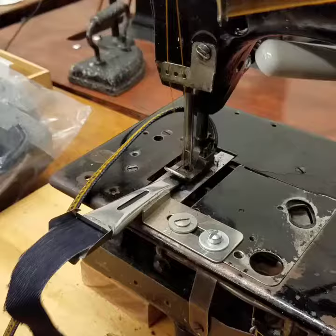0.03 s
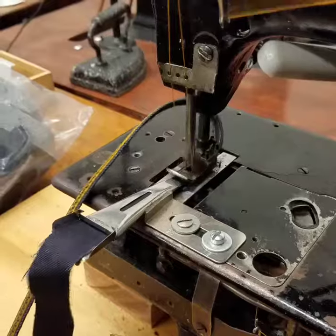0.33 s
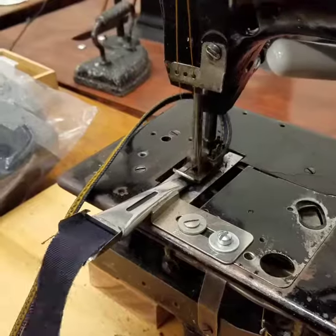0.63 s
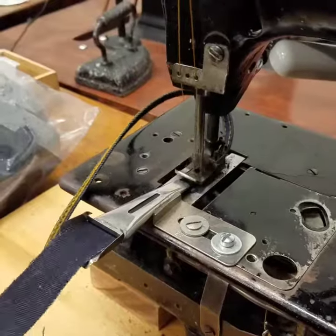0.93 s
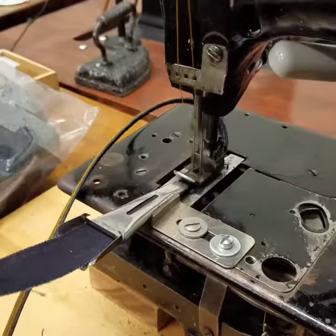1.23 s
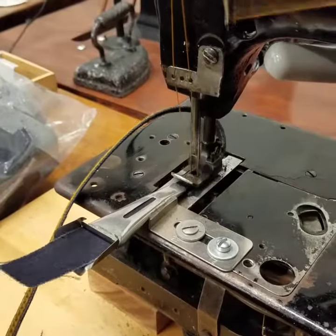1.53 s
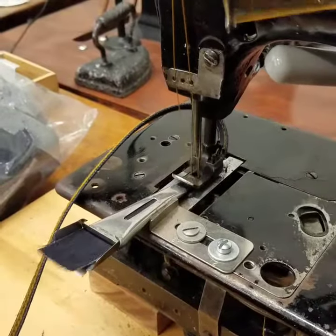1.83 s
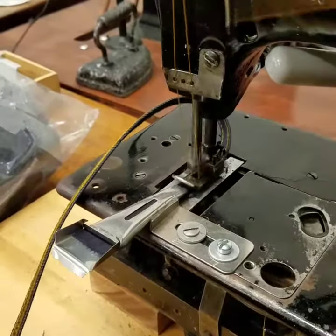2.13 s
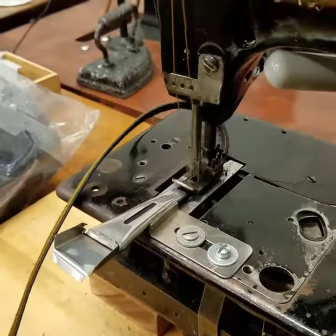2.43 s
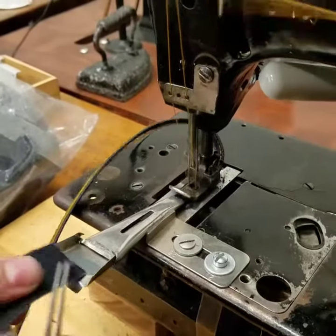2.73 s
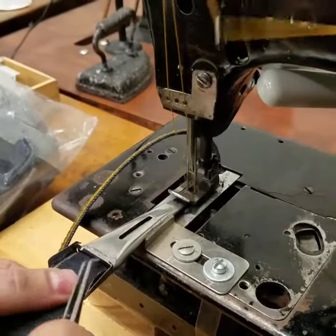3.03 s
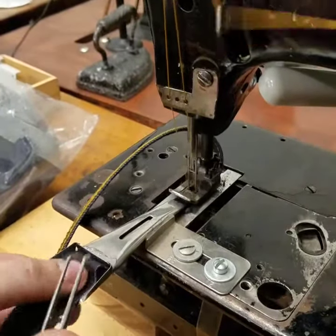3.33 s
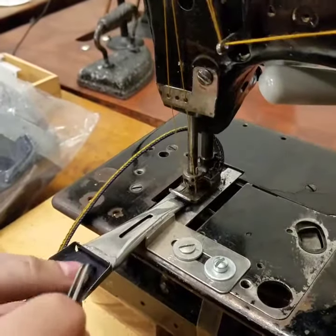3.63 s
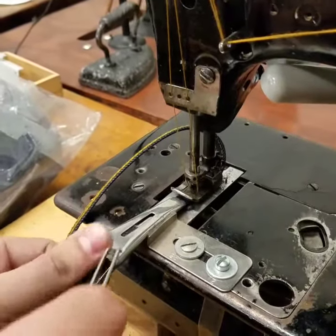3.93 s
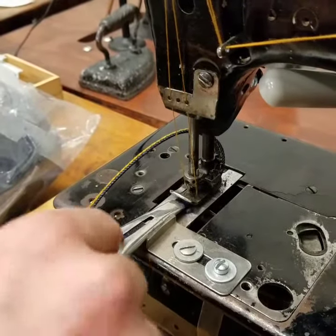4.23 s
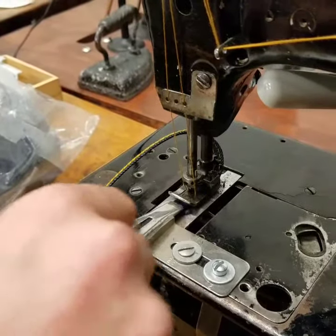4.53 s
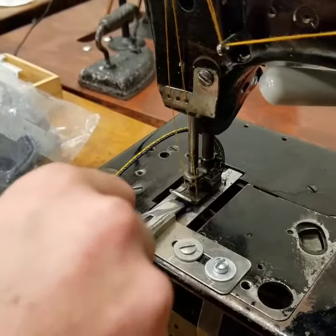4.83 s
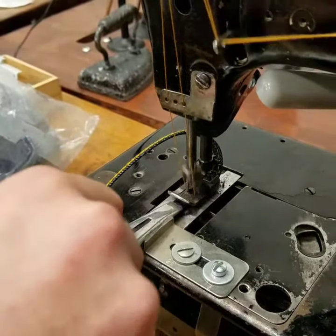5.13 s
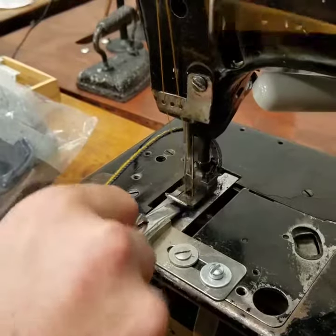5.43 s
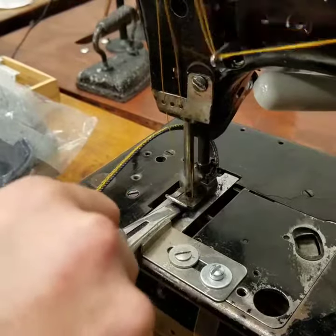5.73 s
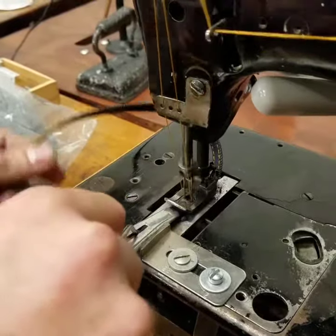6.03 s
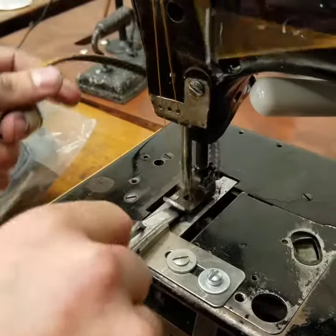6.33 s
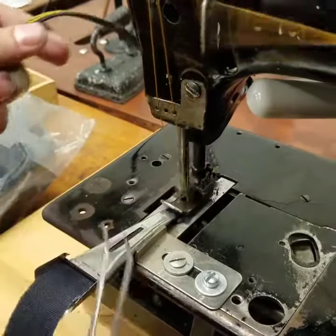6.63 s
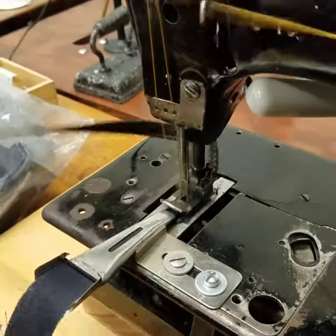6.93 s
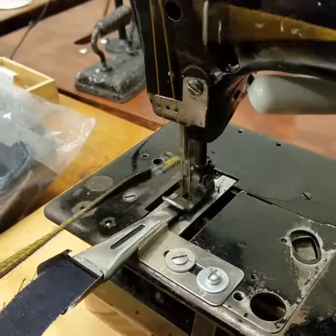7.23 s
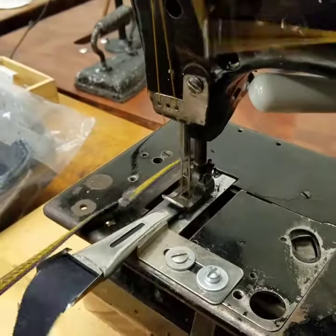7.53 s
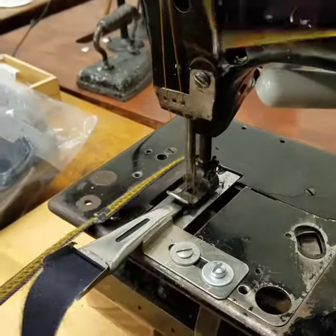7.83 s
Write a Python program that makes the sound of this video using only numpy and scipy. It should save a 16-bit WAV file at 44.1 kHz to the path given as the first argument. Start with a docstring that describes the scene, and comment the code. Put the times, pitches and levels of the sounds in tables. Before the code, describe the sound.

Loud, rapid sewing machine clatter winds down, pauses with light tweezer clicks over a faint motor hum, then bursts briefly and runs again.

```python
"""An old industrial sewing machine clatters flat out, binding a tape; it slows to a stop, makes a short
burst and runs again. Every stitch is a down blow and a lighter return blow that clack the linkage, ring
the cast arm and shake the table, while the shafts whirr and the thread sizzles. In the pause the motor
idles, tweezers click on the steel tape guide, the machine knocks softly and hands brush the bed."""
import sys
import numpy as np
from scipy import signal
from scipy.fft import rfft, irfft, next_fast_len
from scipy.io import wavfile
from scipy.ndimage import uniform_filter1d

SR = 44100
rng = np.random.default_rng(int(sys.argv[2]) if len(sys.argv) > 2 else 0)


def write(x):
    x = np.atleast_2d(x).T
    wavfile.write(sys.argv[1], SR, np.round(np.clip(x, -1, 1) * 32767).astype(np.int16))


N = 356769
TIME = np.arange(N) / SR


def amp(db):
    """Decibels to gain."""
    return 10 ** (np.asarray(db) / 20)


def unit(x):
    """Scale to rms 1."""
    return x / np.sqrt(np.mean(x ** 2) + 1e-20)


def along(points, hz):
    """Read (Hz, value) points on a log frequency axis."""
    f, v = np.transpose(points)
    return np.interp(np.log(hz + 1), np.log(f + 1), v)


def filtered(x, response):
    """EQ x with a gain that is a function of frequency."""
    size = x.shape[-1]
    padded = next_fast_len(size + 8192)
    return irfft(rfft(x, padded) * response(np.fft.rfftfreq(padded, 1 / SR)), padded)[..., :size]


def noise(colour, alike, size=N):
    """Coloured stereo noise of rms 1; both ears share `alike` of the treble and nearly all the bass."""
    mid, side = filtered(rng.standard_normal((2, size)), lambda hz: amp(along(colour, hz)))
    width = np.sqrt((1 - alike) / (1 + alike))
    side = filtered(side, lambda hz: width * np.clip(hz / 1100, .1, 1))
    return unit(np.array([mid + side, mid - side]))


def grains(depth_db, size):
    """A spiky gain of rms 1, each spike about size samples long."""
    return unit(amp(depth_db * unit(uniform_filter1d(rng.standard_normal(N), size))))


def impulses(times, db):
    """One impulse for each blow."""
    return np.bincount(np.round(np.clip(times, 0, None) * SR).astype(int), amp(db), N)[:N]


def delayed(blows, seconds):
    """The same blows a moment later."""
    return np.pad(blows, (round(seconds * SR), 0))[:N]


def ring(blows, modes, lag_s=.00013):
    """Blows ring damped modes of alternating sign; the left ear hears them lag_s later."""
    t = np.clip(np.arange(SR // 2) / SR - np.array([[lag_s], [0]]), 0, None)
    answer = sum((-1) ** k * amp(db - 60 * t / t60) * np.sin(2 * np.pi * hz * t)
                 for k, (hz, db, t60) in enumerate(modes))
    return signal.fftconvolve(blows[None], answer, axes=1)[:, :N]


def burst(blows, colour, t60, repeat, alike):
    """Dense ringing after each blow: the share `repeat` is the same every time, the rest is new."""
    size = SR // 4
    fade = amp(-60 * np.arange(size) / SR / t60)
    same = signal.fftconvolve(blows[None], fade * noise(colour, alike, size), axes=1)[:, :N]
    envelope = np.sqrt(np.abs(signal.fftconvolve(blows ** 2, fade ** 2)[:N]))
    fresh = envelope * noise(colour, alike)
    return np.sqrt(repeat) * same + np.sqrt(1 - repeat) * fresh


# Low room tone. Each row: frequency in Hz, relative level in dB.
ROOM_TONE = [(15, -32), (25, -13.5), (120, 7), (249, -9.5), (301, 9), (439, -41), (1160, -15.5),
             (1440, -24), (2480, -36), (3160, -32), (4370, -36.5), (16000, -64)]
# The motor's two hum notes. Each row: pitch in Hz, relative level in dB.
MOTOR_HUM = [(70.0, -60), (118.4, -57.5)]
def idling_motor():
    """The clutch motor hums all the time over the air of the room."""
    hum = sum(np.sqrt(2) * amp(db - 3.5) * np.sin(2 * np.pi * (hz * TIME + rng.random()))
              for hz, db in MOTOR_HUM)
    return hum + amp(-55) * noise(ROOM_TONE, alike=.25)


# A tail that lingers in the lows. Each row: frequency in Hz, time to fall 60 dB (t60) in seconds.
ROOM_DECAY = [(150, 0.98), (400, 1), (2500, 0.23), (6000, 0.11), (15000, 0.065)]
# EQ of the reverb return. Each row: frequency in Hz, gain in dB.
REVERB_EQ = [(60, -34), (300, -16.5), (600, -18), (1200, -13), (2500, -12), (6000, -9), (15000, -10.5)]
def workshop(x):
    """The room's reverb, each frequency dying at its own speed."""
    hz, t, spectrum = signal.stft(rng.standard_normal((2, SR // 2)), SR, nperseg=256)
    decay = amp(-60 * t / along(ROOM_DECAY, hz)[:, None])
    mid, side = signal.istft(spectrum * decay, SR, nperseg=256)[1]
    side = filtered(side, lambda f: np.clip(f / 1200, 0, 1))  # long waves reach both ears alike
    tail = np.array([mid + side, mid - side])
    tail = filtered(tail / np.linalg.norm(tail[0]), lambda f: amp(along(REVERB_EQ, f)))
    return signal.fftconvolve(x, tail, axes=1)[:, :N]


# Bright contact on the guide, for scrapes and ticks. Each row: frequency in Hz, relative level in dB.
GUIDE_COLOUR = [(290, -45), (500, -1.5), (1400, -11), (2540, 4.5), (3290, -9.5), (4940, 5), (5630, -5.5),
                (7980, -6.5), (9770, -7.5), (11500, -0.5), (16000, -9)]
# Pushes of the tape. Each row: middle in seconds, half length in seconds, relative level in dB.
TAPE_PUSHES = [(3.813, 0.01, -55), (3.88, 0.02, -64), (4.05, 0.0049, -61.5), (4.582, 0.011, -55.5),
               (4.624, 0.014, -51), (4.755, 0.044, -61.5), (5.205, 0.022, -51.5)]
def tape():
    """The weave catches on the steel guide in short grainy strokes."""
    push = sum(amp(db) * np.exp(-.5 * ((TIME - middle) / half) ** 2) for middle, half, db in TAPE_PUSHES)
    return push * grains(depth_db=2, size=90) * noise(GUIDE_COLOUR, alike=.18)


# Small clicks and knocks. Each row: start in seconds, relative level in dB, bed and arm sends in dB.
SMALL_HITS = [(3.276, -12, -13.5, -27), (3.7288, -31.5, -8.5, -17), (3.8708, -37.5, -15, -30),
              (3.881, -38.5, -23, -28), (3.896, -44, -16, -28), (4.1222, -23, -25, -17),
              (4.2092, -22.5, -28.5, -27), (4.2221, -14.5, -19, -38), (4.2974, -31.5, -24, -27),
              (4.4037, -47, -23, -6), (4.477, -44.5, -7, -1), (4.7023, -36.5, -16, -33),
              (4.854, -28, -24, -13.5), (4.9735, -27, -20, -23), (5.09, -45, -15.5, -18),
              (5.1102, -50, 4.5, 10)]
# Thin ping of the guide. Each row: pitch in Hz, relative level in dB, t60 in seconds.
GUIDE_MODES = [(2480, -5, .05), (2650, -10, .1), (4860, -9, .1), (5250, -12, .09), (11650, -2, .05),
               (15050, -7, .05)]
# Dull knock of the bed. Each row: frequency in Hz, relative level in dB.
BED_COLOUR = [(80, -25), (170, 6.5), (300, -4.5), (430, -16), (600, -3.5), (780, -3.5), (1100, -17.5),
              (3000, -32)]
def clicks_and_knocks():
    """Bright steel ticks on the guide, and a few soft knocks of the machine that ring its arm."""
    starts, db, bed_db, arm_db = np.transpose(SMALL_HITS)
    hits = impulses(starts, db)
    tick = amp(-3.5) * burst(hits, GUIDE_COLOUR, t60=.025, repeat=.17, alike=.15)
    ping = amp(-14.5) * ring(hits, GUIDE_MODES, lag_s=.00002)
    shimmer = amp(-39) * burst(hits, GUIDE_COLOUR, t60=.75, repeat=.54, alike=.2)
    knock = amp(-5) * burst(impulses(starts, db + bed_db), BED_COLOUR, t60=.26, repeat=.54, alike=.5)
    arm = ring(impulses(starts, db + arm_db + 11.5), ARM_MODES)
    return tick + ping + shimmer + knock + arm


# Tempo curves of the three pedal presses. Each row: time in seconds, speed in stitches a second.
FIRST_RUN = [(.055, 19.385), (2.88, 19.385), (2.936, 13.44), (3.101, 10.03), (3.43, 10.28), (3.5, 4.8),
             (3.64, 2.75), (3.72, 0)]
SHORT_BURST = [(5.2595, 10.75), (5.46, 18.34), (5.556, 20.64), (5.646, 14.36), (5.755, 7.8), (5.892, 0)]
LAST_RUN = [(6.1875, 13.2), (6.35, 19.447), (8.09, 19.447)]
# Pedal presses. Each row: tempo curve, starting shaft position in turns, pedal release in seconds.
PRESSES = [(FIRST_RUN, -.003, 3.48), (SHORT_BURST, .48, 5.86), (LAST_RUN, -.001, 8.09)]
FULL_SPEED_HZ, COAST_DB_PER_S = 19.4, 67
def shaft(press):
    """One press over time: turns made, octaves below full speed, and a gain that fades on release."""
    curve, start_turn, release_s = press
    speed = np.interp(TIME, *np.transpose(curve), left=0, right=0)
    turns = start_turn + np.cumsum(speed) / SR
    slow = np.log2(FULL_SPEED_HZ / np.maximum(speed, 2))
    gain = (speed > 0) * amp(-COAST_DB_PER_S * np.clip(TIME - release_s, 0, None))
    return turns, slow, gain


def strokes(turn, db, db_per_octave, scatter_db, jitter_s, late_s=0):
    """An impulse each time the shaft passes a place in its turn; the slower it runs, the softer."""
    blows = np.zeros(N)
    for turns, slow, gain in map(shaft, PRESSES):
        passes = np.arange(np.ceil(turns[0] - turn), turns[-1] - turn) + turn
        at = np.searchsorted(turns, passes)
        level_draw, time_draw = rng.standard_normal((len(at), 2)).T
        level = db - db_per_octave * slow[at] + 20 * np.log10(gain[at]) + scatter_db * level_draw
        blows += impulses(at / SR + late_s + jitter_s * time_draw, level)
    return blows


# Fader ride for the hands on tape and bed. Each row: time in seconds, relative level in dB.
HAND_BRUSHING = [(3.7, -72.5), (3.92, -56.5), (4.09, -62), (4.16, -50), (4.25, -78), (4.36, -56),
                 (4.88, -69.5), (5.15, -72)]
# Soft, woolly rubbing. Each row: frequency in Hz, relative level in dB.
FRICTION_COLOUR = [(40, -33.5), (100, -18), (300, 14), (600, 1), (1000, -2), (1450, -8), (2400, 4),
                   (3200, -4.5), (4500, -6), (7000, -15.5), (10000, -17), (16000, -21)]
def friction():
    """Shafts whirr louder with speed, the clutch slips before each restart, hands brush in the pause."""
    whirr = sum(gain * amp(-25 - 6 * slow) for _, slow, gain in map(shaft, PRESSES))
    run_out = TIME / .096  # the whirr dies away with a 96 ms time constant
    whirr = np.exp(np.maximum.accumulate(np.log(whirr + 1e-20) + run_out) - run_out)
    restarts = [curve[0][0] for curve, _, _ in PRESSES[1:]]
    slip = sum(amp(-50.5) * (TIME < bite) * np.exp(-np.abs(TIME - bite) / .091) for bite in restarts)
    hands = amp(np.interp(TIME, *np.transpose(HAND_BRUSHING), left=-120, right=-120))
    return (whirr + slip + hands) * grains(depth_db=3, size=130) * noise(FRICTION_COLOUR, alike=.067)


# Swells of thread on the hook. Each row: place in turns, width in turns, relative level in dB.
HOOK_RUBS = [(.34, 0.054, -4), (.46, 0.065, 0), (.86, 0.052, 1.5), (.99, 0.036, -2.5)]
# Flicks of thread on its guides. Each row: place in turns, relative level in dB.
THREAD_FLICKS = [(.315, -2), (.352, 1), (.825, -5.5), (.865, 0.5)]
# Airy top-end sizzle. Each row: frequency in Hz, relative level in dB.
THREAD_COLOUR = [(2000, -20.5), (5000, -22), (9400, -9), (11000, 4.5), (12600, 0), (15000, 3.5), (16000, 1)]
# Trim of the thread layer. Each entry: gain in dB for one pedal press.
THREAD_TRIM_DB = [0.5, -2.5, -1]
def thread():
    """Hook and thread sizzle and flick at the same places in every turn, louder with speed."""
    place = np.linspace(0, 1, num=200)
    swell = amp(-4) + sum(amp(db) * np.exp(-.5 * (((place - turn + .5) % 1 - .5) / width) ** 2)
                          for turn, width, db in HOOK_RUBS)
    rub = sum(gain * amp(-29 - 12 * slow) * np.interp(turns % 1, place, swell)
              for turns, slow, gain in map(shaft, PRESSES))
    flicks = sum(strokes(turn, db - 22, db_per_octave=4.5, scatter_db=1.5, jitter_s=.012 / FULL_SPEED_HZ)
                 for turn, db in THREAD_FLICKS)
    sizzle = amp(-2.5) * rub * grains(depth_db=4, size=30) * noise(THREAD_COLOUR, alike=.1)
    ticks = burst(flicks, THREAD_COLOUR, t60=.0093, repeat=.2, alike=.1)
    press = np.searchsorted([curve[0][0] for curve, _, _ in PRESSES[1:]], TIME)
    return amp(THREAD_TRIM_DB)[press] * (sizzle + ticks)


# Narrow upper-mid snap, for needle and drive. Each row: frequency in Hz, relative level in dB.
SNAP_COLOUR = [(700, -37.5), (1500, -26.5), (2300, 5), (3000, 0.5), (4200, -34.5), (12000, -34)]
def needle():
    """The needle punches the tape with a short dry tick just before the down blow."""
    punches = strokes(turn=.915, db=-18, db_per_octave=11.5, scatter_db=1, jitter_s=.0003)
    return burst(punches, SNAP_COLOUR, t60=.02, repeat=.42, alike=.15)


# Jolts of clutch and brake. Each row: start in seconds, relative level in dB.
JOLTS = [(5.205, -28), (5.88, -9.5), (6.1434, -25)]
def stitching(db_per_octave, back_db, back_db_per_octave, jolt_db, scatter_db, jitter_s, back_late_s=0):
    """A down blow each turn, a lighter blow back half a turn later, and the jolts of clutch and brake."""
    down = strokes(0, 0, db_per_octave, scatter_db, jitter_s)
    back = strokes(.49, back_db, back_db_per_octave, scatter_db, jitter_s, back_late_s)
    starts, db = np.transpose(JOLTS)
    return down + back + impulses(starts, db + jolt_db)


# The clutch takes up the slack for the last run. Each row: start in seconds, relative level in dB.
CLUTCH_BITES = [(6.1445, -26), (6.1875, -8.5), (6.196, -12.5), (6.249, -20.5)]
# Clank of loose drive parts. Each row: pitch in Hz, relative level in dB, t60 in seconds.
DRIVE_MODES = [(1660, -3, 0.046), (2057, 6.5, 0.043), (2220, -12, .055), (2540, 4.5, 0.049),
               (2700, -6, .04)]
def drive():
    """Below full speed the drive hangs slack and clanks with each blow, hardest when the clutch bites."""
    slack = sum((gain > 0) * np.sqrt(np.clip(slow, 0, 1)) for _, slow, gain in map(shaft, PRESSES))
    blows = stitching(db_per_octave=2.5, back_db=-6, back_db_per_octave=1.3,
                      jolt_db=0, scatter_db=2.5, jitter_s=.0001)
    clanks = amp(-13.5) * slack * blows + impulses(*np.transpose(CLUTCH_BITES))
    snap = amp(-10.5) * burst(clanks, SNAP_COLOUR, t60=.068, repeat=.41, alike=.15)
    return snap + amp(-10) * ring(clanks, DRIVE_MODES, lag_s=.00005)


# Hard, mid-forward clack. Each row: frequency in Hz, relative level in dB.
CLACK_COLOUR = [(60, -46), (200, -36), (700, 3.5), (1050, 9.5), (1350, -5.5), (1600, -1.5), (1950, -1.5),
                (2450, -0.5), (3200, -8.5), (4000, -4), (5500, -14), (7300, -21), (9500, -23),
                (16000, -27.5)]
# Steel ring of needle bar and links. Each row: pitch in Hz, relative level in dB, t60 in seconds.
LINK_MODES = [(1883, -1.5, 0.053), (2384, 4, 0.045), (3576, -2.5, 0.049), (3850, -0.5, 0.06),
              (4540, -0.5, 0.049), (5470, -10, 0.034)]
def linkage():
    """Play in the worn links closes with a steel clack at each reversal, and the links rebound once."""
    blows = stitching(db_per_octave=4.5, back_db=-5.5, back_db_per_octave=1.5,
                      jolt_db=1, scatter_db=.9, jitter_s=.0001)
    rebounds = amp(-12) * delayed(blows, seconds=.0055)
    rattle = amp(-16) * burst(blows, CLACK_COLOUR, t60=.073, repeat=.7, alike=.072)
    crack = amp(-10.5) * burst(blows + rebounds, CLACK_COLOUR, t60=.018, repeat=.7, alike=.15)
    return rattle + crack + amp(-20.5) * ring(blows, LINK_MODES, lag_s=.00008)


# The body of the machine. Each row: pitch in Hz, relative level in dB, t60 in seconds.
TABLE_MODES = [(56, -49.5, .5), (130.5, -28.5, 0.28), (204.3, -37.5, 0.37), (256.9, -15.5, 0.094),
               (310.94, -12.5, 0.16), (348.7, -26, 0.37), (402.3, -26, 0.31), (513.9, -19.5, .1),
               (570, -22.5, 0.11)]  # thud of bed and table top
STAND_MODES = [(152, -33, .3), (281, -42, .9), (302, -39, .8), (466, -39, .3), (680, -39, .25)]  # slow-dying drone of the stand
ARM_MODES = [(674, -26.5, 0.04), (793, -23, 0.12), (864.5, -17, 0.071), (1001, -16, 0.044),
             (1041.3, -18.5, 0.1), (1110, -18, .04)]  # ring of the cast-iron arm
HEAD_MODES = [(1054, -16.5, 0.036)]  # hollow knock of the needle head
def frame():
    """The blows ring the head and arm at once and reach the table and stand a moment later."""
    shake = stitching(db_per_octave=4.5, back_db=-7, back_db_per_octave=4, back_late_s=-.0017,
                      jolt_db=2.5, scatter_db=.6, jitter_s=.00005)
    shake = delayed(shake, seconds=.0022)
    knock = stitching(db_per_octave=5, back_db=-7, back_db_per_octave=4.5, back_late_s=.00026,
                      jolt_db=-4, scatter_db=.7, jitter_s=.00005)
    table = amp(-.2) * ring(shake, TABLE_MODES, lag_s=.000077)
    stand = ring(shake, STAND_MODES, lag_s=.00029)
    arm = amp(.5) * ring(knock, ARM_MODES, lag_s=.00019)
    head = amp(-4.5) * ring(knock, HEAD_MODES, lag_s=.000067)
    return table + stand + arm + head


# Pan across the spectrum. Each row: frequency in Hz, left minus right in dB.
PAN = [(60, -13.5), (130, 0), (290, -2), (640, -2.5), (1410, -4), (3100, -4), (6820, 1), (15000, -9.5)]
def scene():
    """The machine stands a little to the right, in a small workshop."""
    near = frame() + linkage() + needle() + drive() + thread() + friction() + clicks_and_knocks() + tape()
    panned = filtered(near + workshop(near), lambda hz: amp(np.array([[.5], [-.5]]) * along(PAN, hz)))
    return panned + idling_motor()


def record(dry):
    """The sound cuts in after a moment, its highest peaks rounded and its very top removed."""
    ceiling, opens_s, top_hz = .9, .069, 15950
    rounded = dry / (1 + np.abs(dry / ceiling) ** 6) ** (1 / 6)
    return filtered(rounded * (TIME > opens_s), lambda hz: hz < top_hz)


dry = scene()
out = record(dry)
write(out)
```